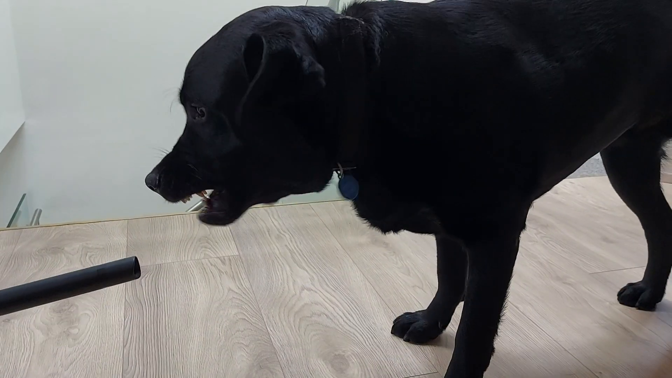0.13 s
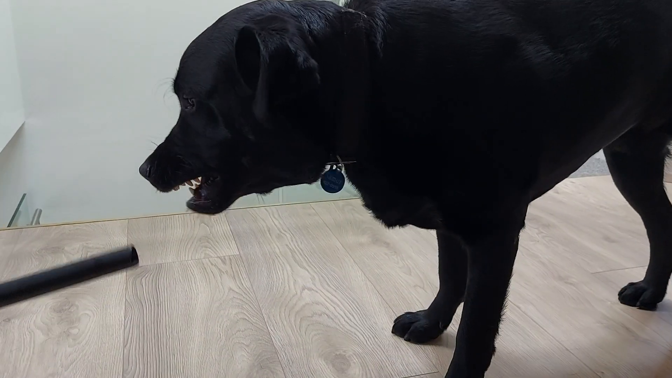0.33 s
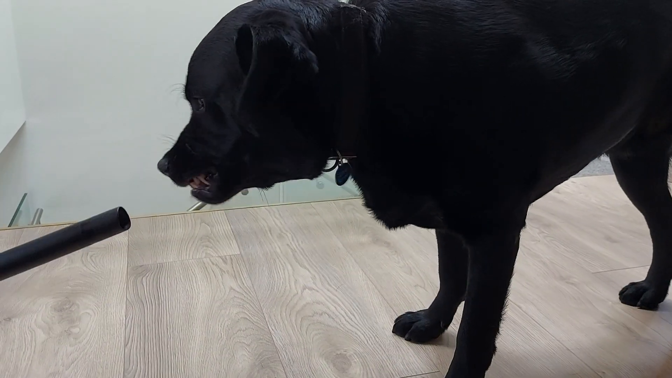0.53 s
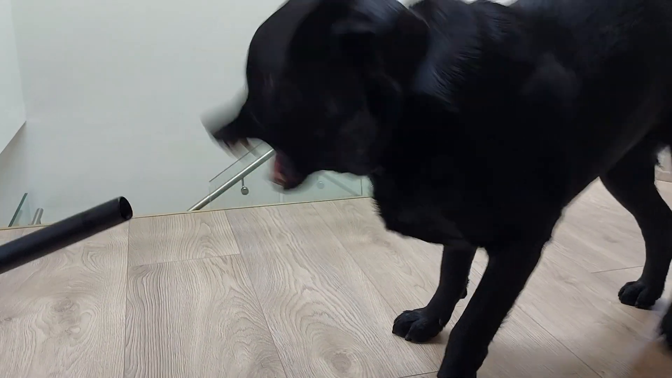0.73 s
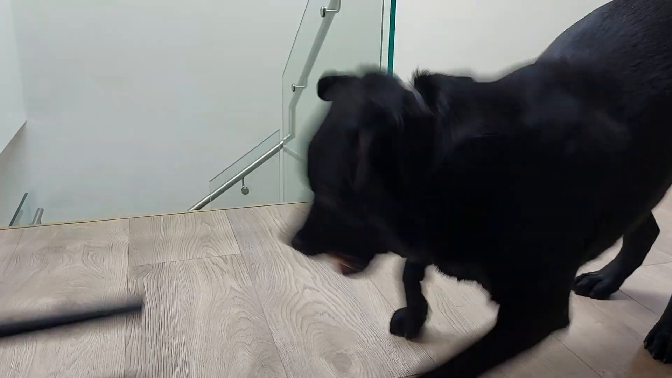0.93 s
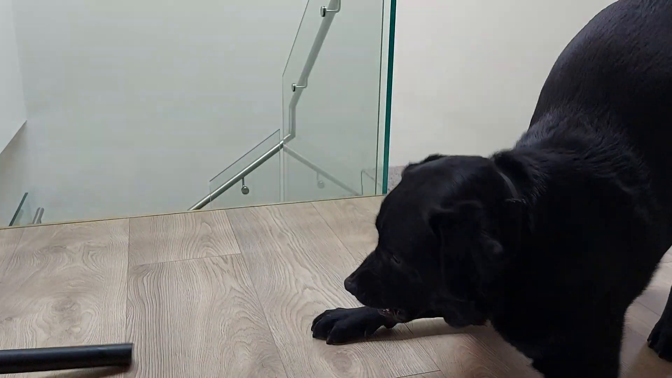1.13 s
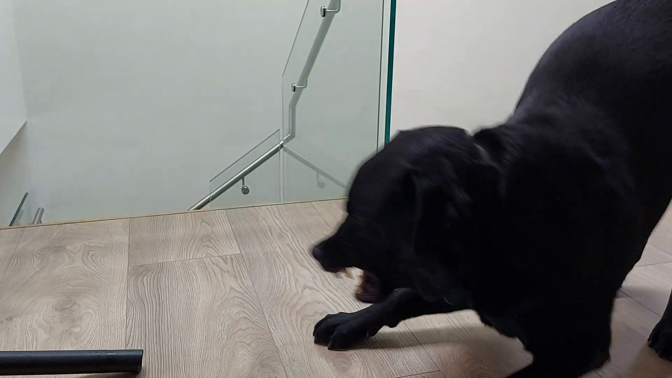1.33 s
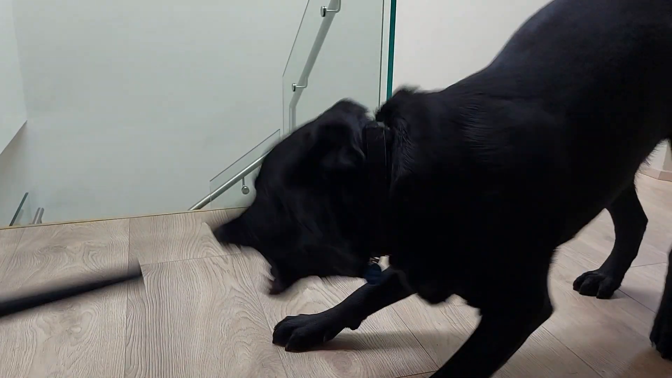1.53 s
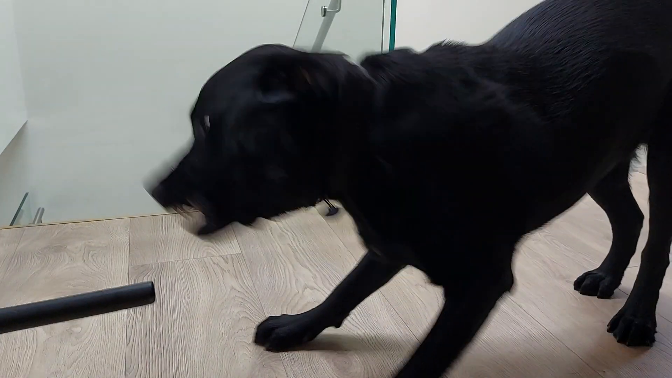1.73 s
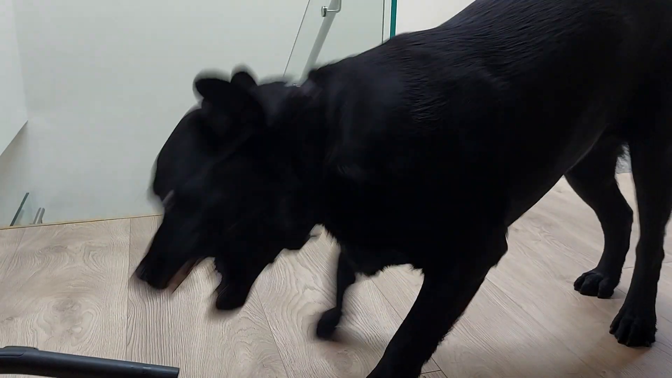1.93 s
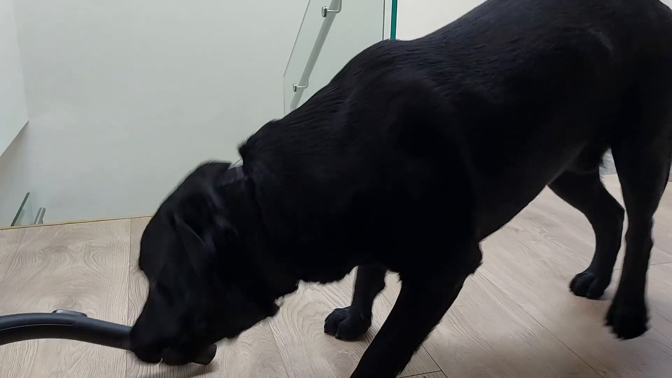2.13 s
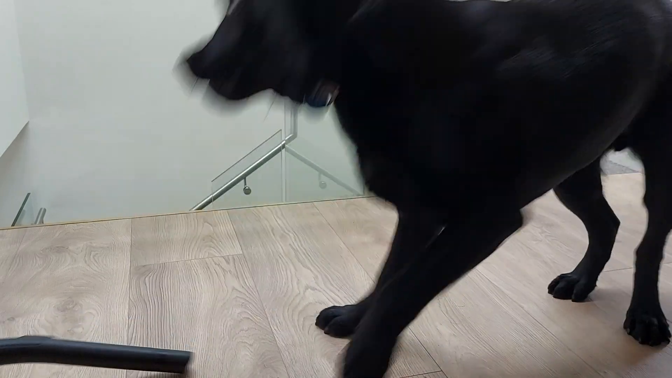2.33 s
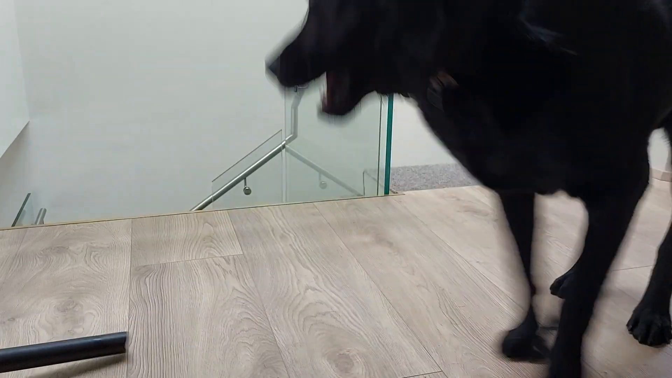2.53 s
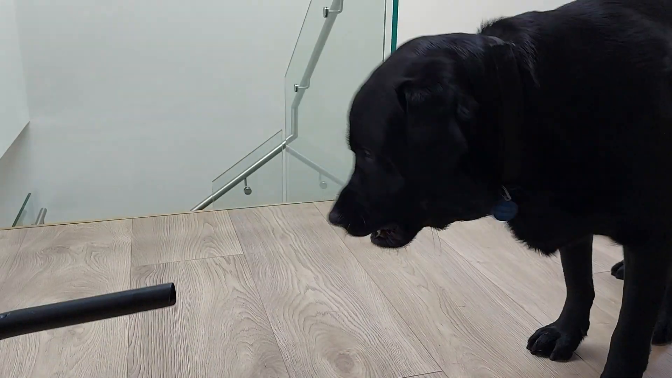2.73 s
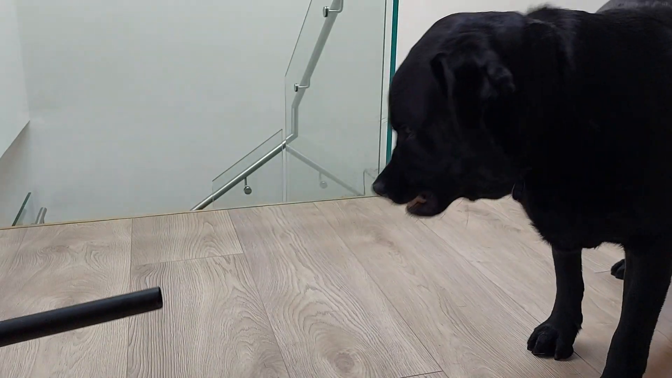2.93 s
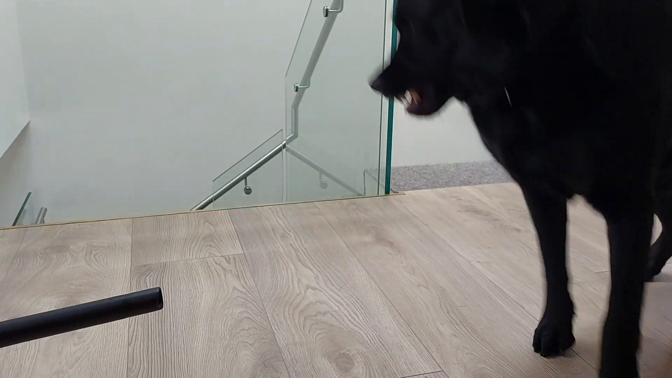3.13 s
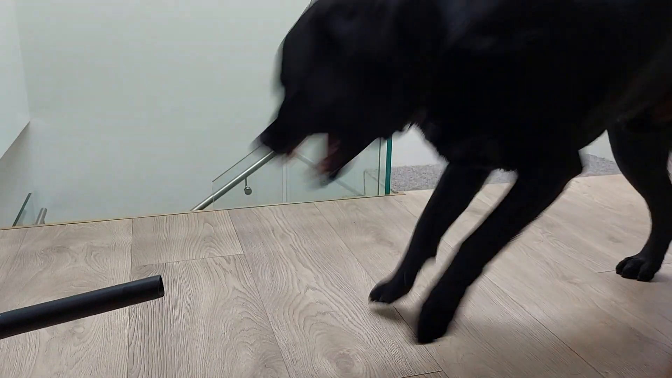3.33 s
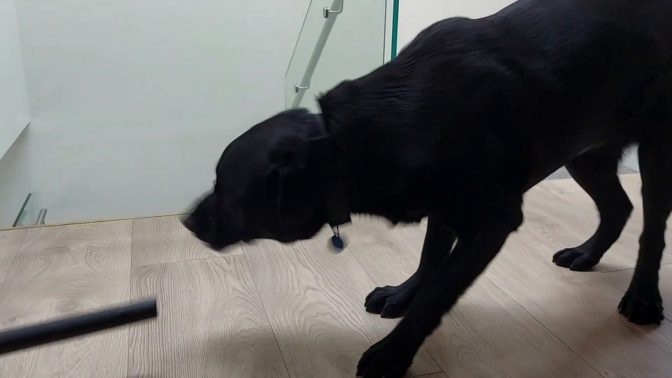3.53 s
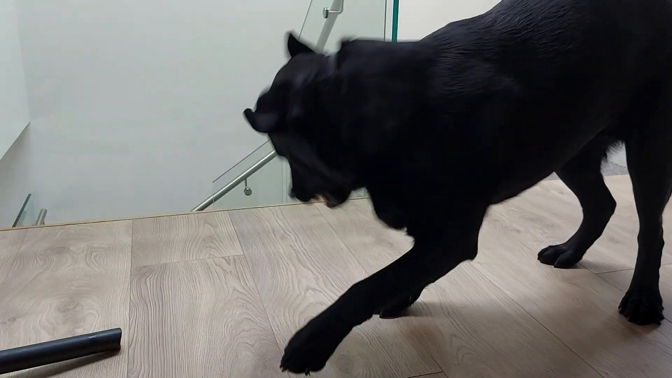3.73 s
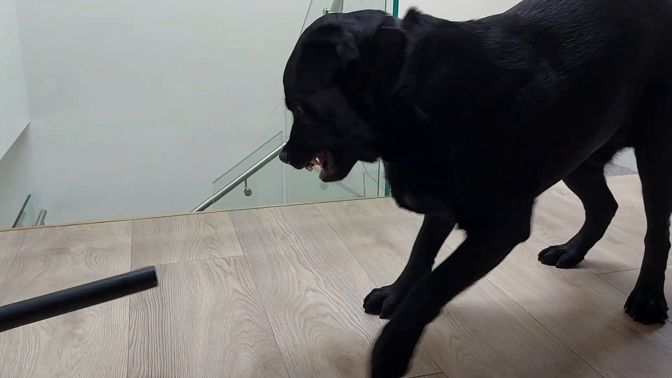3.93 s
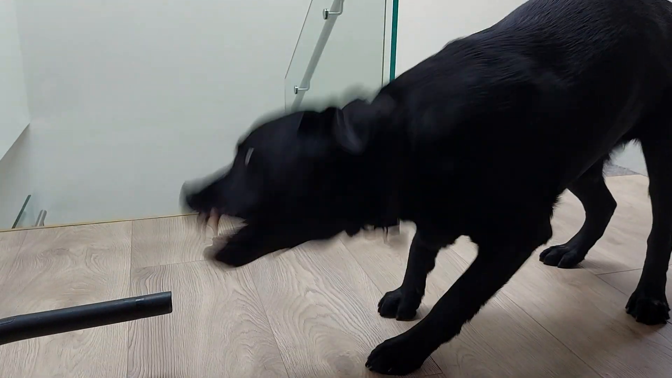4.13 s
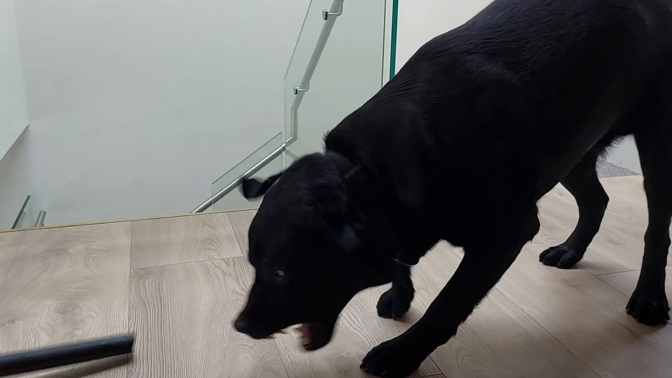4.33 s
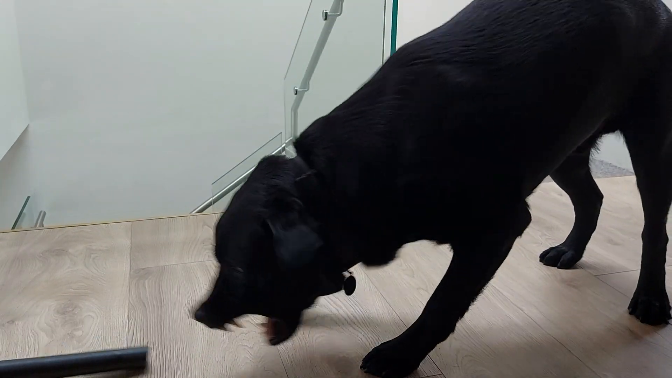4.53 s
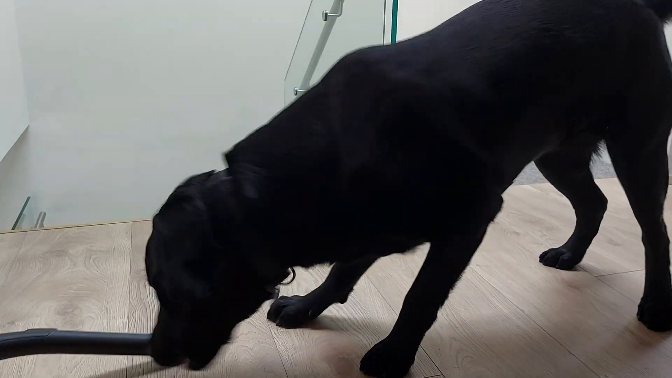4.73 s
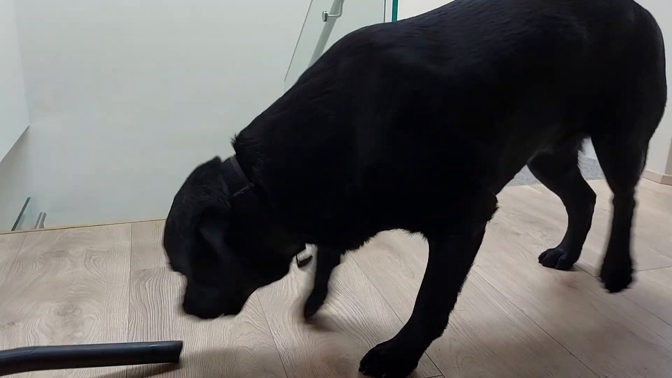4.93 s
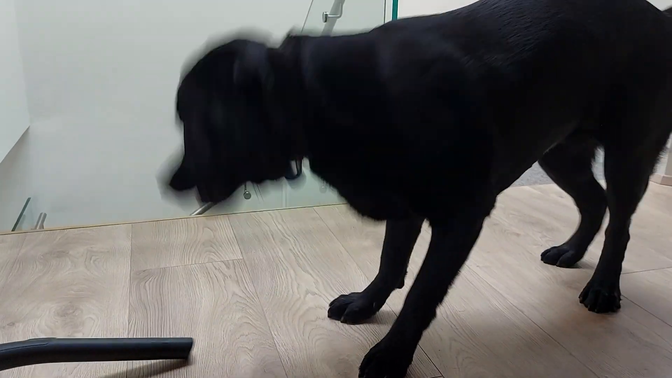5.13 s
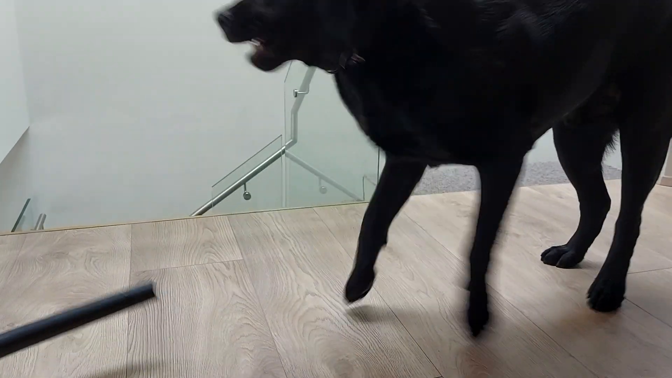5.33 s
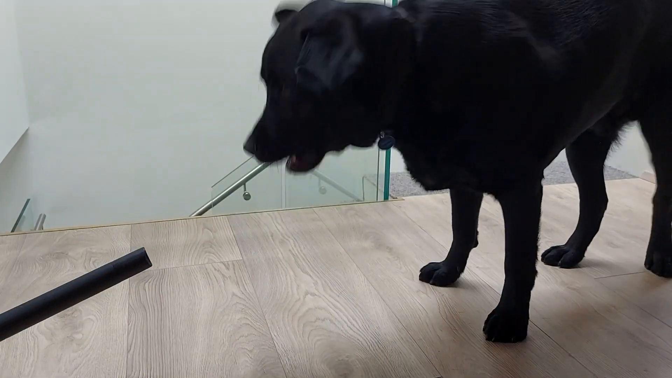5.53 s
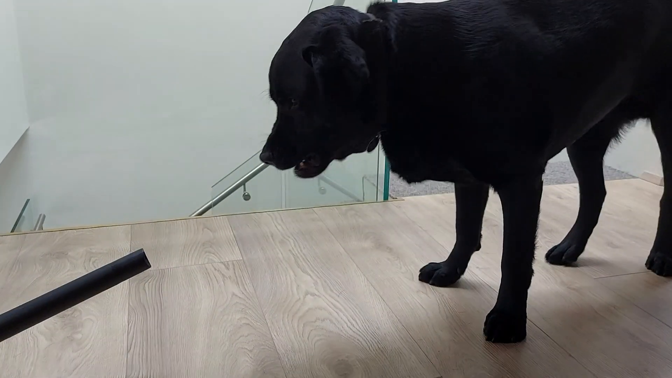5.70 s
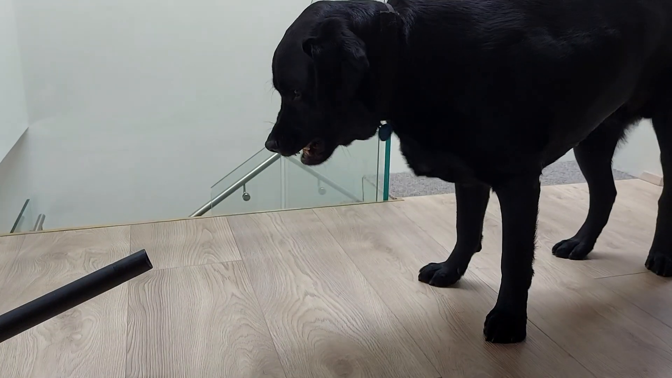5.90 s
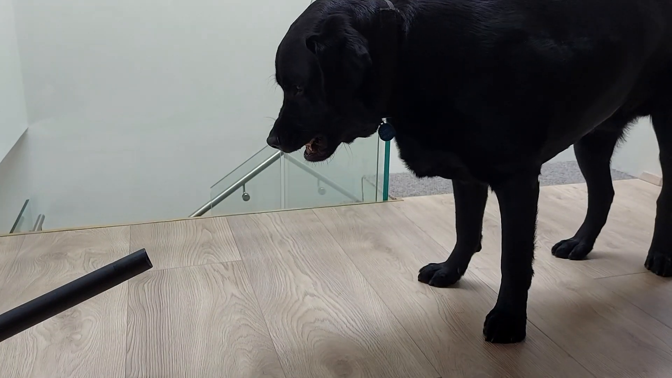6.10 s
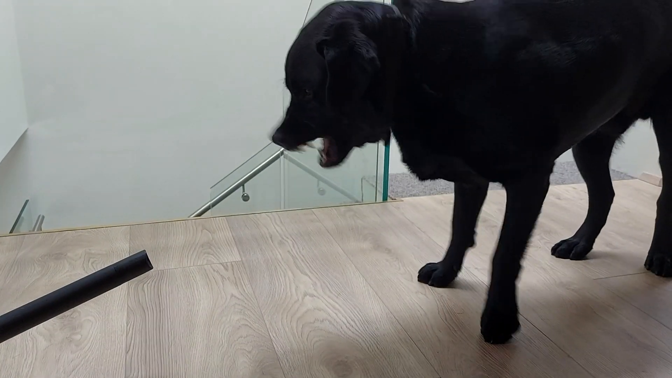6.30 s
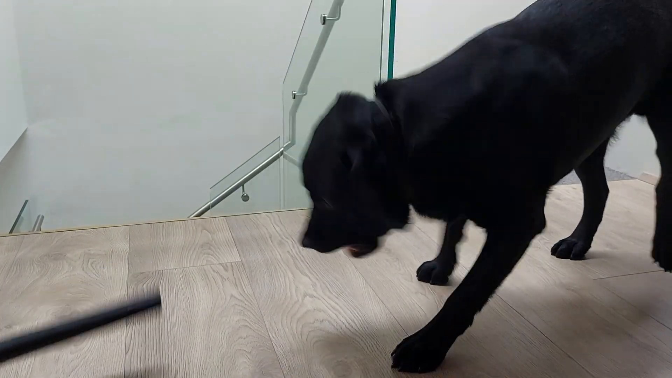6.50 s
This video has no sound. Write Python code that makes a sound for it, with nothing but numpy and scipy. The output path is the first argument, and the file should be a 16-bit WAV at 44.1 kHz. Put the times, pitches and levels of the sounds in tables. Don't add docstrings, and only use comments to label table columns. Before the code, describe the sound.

A vacuum cleaner runs throughout, a steady mid-pitched electric whine wrapped in rushing air and nozzle hiss. Close by, a large dog barks at about 0.8 s, a high, raspy bark falling in pitch, its echo ringing through a hard stairwell. Claws tick around 1.0 s, then a breathy, rising second bark comes at 1.6 s. From 2.0 to 3.0 s there are only scattered claw clicks and soft paw thuds over the motor. The background swells strongly before a short, loud bark at 3.45 s; a sharp, very brief one follows at 4.15 s, and at 4.55 s a low growl bursts into a bark. Faint collar-tag tings surround these. More claws and a thud come between 5.0 and 5.6 s. The noise swells again before a last rough, rising bark at 6.4 s, its echo lingering over the still-running vacuum.

```python
import sys
import numpy as np
from scipy import signal
from scipy.fft import rfft, irfft, next_fast_len
from scipy.io import wavfile
from scipy.ndimage import uniform_filter1d, minimum_filter1d

SR = 44100
rng = np.random.default_rng(int(sys.argv[2]) if len(sys.argv) > 2 else 0)


def voltage_ratio(level):
    return 10 ** (np.asarray(level, float) / 20)


def wav_out(sig):
    wavfile.write(sys.argv[1], SR, np.round(np.clip(np.atleast_2d(sig).T, -1, 1) * 32767).astype(np.int16))


N = 293706

# [t/s, fold pitch f/Hz, effort level/dB]
BARKS = [
    [(.762, 556.3, -47), (.812, 622.3, -24.5), (.818, 681.7, -17), (.858, 628.7, -17.5),
     (.88, 504.4, -16.5), (.955, 466, -19.5), (.985, 422, -28)],
    [(1.565, 272, -41.5), (1.6, 330.4, -23.5), (1.635, 449.2, -15.5), (1.66, 547.4, -11),
     (1.775, 514.2, -17.5), (1.83, 541, -20.5), (1.855, 533, -57)],
    [(3.45, 395.6, -57), (3.472, 453.6, -18), (3.51, 588, -19.5), (3.55, 641, -8.5), (3.595, 547, -17),
     (3.635, 466, -35.5)],
    [(4.15, 356.6, -27), (4.163, 379, -15), (4.183, 437.6, -10), (4.218, 551, -9.5), (4.238, 489.4, -11.5),
     (4.27, 398, -18.5)],
    [(4.548, 290, -70), (4.562, 279.2, -27.5), (4.65, 272.7, -26), (4.68, 307.8, -28.5),
     (4.71, 380.4, -17.5), (4.755, 534, -9), (4.805, 426.7, -18), (4.85, 443, -36)],
    [(6.38, 374, -50), (6.392, 378.1, -18.5), (6.408, 422, -18.5), (6.422, 546.3, -16.5),
     (6.5, 640.7, -24.5), (6.56, 440, -23)],
]
# [t/s, level/dB]
LIPS = [
    [(.77, -19), (.82, -11.5), (.87, -1.5), (.92, -3.5), (.96, -2)],
    [(1.6, 2.5), (1.64, -3.5), (1.71, -0.5), (1.75, -30)],
    [(3.472, 3.5), (3.492, -42), (3.51, 2), (3.55, 6), (3.59, -4.5)],
    [(4.162, 19.5), (4.19, 7), (4.218, -1.5), (4.23, -19)],
    [(4.55, 0.5), (4.71, 0.5), (4.75, -7.5), (4.77, -25)],
    [(6.38, 5), (6.42, 14), (6.45, -0.5), (6.5, -0.5)],
]
# [t/s, hoarseness 0-1, strong-weak cycles 0-1]
BREAKS = [
    (.74, .68, .1),
    (1.585, .5, .15),
    (3.515, .55, .25),
    (4.15, .5, .12),
    (4.675, .65, .2),
    (6.395, .68, .9),
]
# [mouth resonance f/Hz at middle pitch, power of pitch, breath level/dB]
JAW = [
    (1700, .01, -22.5),
    (1460, 0.25, -18.5),
    (1310, .1, -18.5),
    (1002, 0.61, -20.5),
    (1210, 0.32, -19),
    (1017, 1, -21),
]
# [breath rasp f/Hz, rasp level/dB, upper mouth level/dB, stairwell level/dB]
POSTURES = [
    (4700, 6, -5.5, -1),
    (5650, 9.5, 0, -1.5),
    (4300, -3, -2.5, 0),
    (3850, 4, -2.6, -2.5),
    (4700, 1.5, -2, -3),
    (3700, -1, -1.5, 1.5),
]
# [f/Hz, width/Hz, level/dB]
MOUTH = [(1706, 390, -2.5), (1862, 183, 1), (2136, 290, -6)]
# [f/Hz, width/Hz, level/dB]
BREATH = [(3600, 1300, 9.5), (6150, 1400, 6.5), (7230, 820, 7), (13000, 2000, -3.5)]
MIDDLE_HZ, JAW_OCTAVES_PER_DB, JAW_WIDTH_HZ = 486, 0.23, 240.
LARYNX_HZ, LARYNX_SINK_HZ, THROAT_WIDTH_HZ = 490, 70, 220.
CLEAR, BREAK_S, SHUT_DB, SHUT_SHARE = .07, .035, -30, .4
CLEAR_BREATH_DB, BREATH_PER_MOUTH = -3.5, 0.47
THROB_HZ, THROB_DB, THROB_TOP_S = 40, 4.5, .005
PORT_LAG_S, WET_DB = 0.0001, -5

# [t/s, peak level/dB, f/Hz, left minus right level/dB, bright edge level/dB]
CLAWS = [(1.0415, -17.5, 3615, -3, -41), (1.047, -33.5, 3464, 13, 8), (1.118, -25, 7500, -8, -8),
         (2.0071, -24, 4100, -2.5, -6), (2.362, -23, 3610, -3, -22), (2.5931, -19, 7550, -4, -34),
         (2.62, -27, 3540, -4, -25), (2.66, -16.5, 7100, -1, -14), (2.689, -32, 4950, 6, -21),
         (2.7289, -26, 3900, 0, -18), (2.9597, -34, 4570, -7, -6), (3.441, -36, 7900, -23, -6),
         (3.6916, -31, 7800, -12, -17), (5.0403, -30, 4077, -3, -14), (5.169, -33, 5870, -10, -19),
         (5.4314, -21, 4250, -3, -26), (5.4493, -26, 3330, -3, -21), (5.4898, -24.5, 3850, 0, -22),
         (5.591, -38, 4150, -15, -22), (6.6438, -31.5, 5260, -8, -5)]
SCRAPE_S = 0.014
# [t/s, peak level/dB]
TAG = [
    (3.4196, -42),
    (3.6676, -34),
    (4.2887, -43),
    (4.8898, -44),
]
TAG_HZ, TAG_T60_S = 10600, 0.063
# [t/s, deep boom peak level/dB, board knock peak level/dB]
THUDS = [(0.065, -44.5, -43), (0.787, -50, -29), (0.968, -60, -34), (1.119, -56, -71), (1.451, -55, -43),
         (1.693, -54, -36.5), (1.8, -57, -34), (2.205, -55, -45), (2.329, -70, -67), (3.23, -65, -52),
         (3.431, -53, -53), (3.639, -60, -33), (4.207, -51, -34), (4.754, -55, -35.5), (5.039, -48.5, -38),
         (6.434, -53, -46), (6.561, -60, -36)]
# [f/Hz, width/Hz, level/dB]
FLOOR_BOOM = [(66.6, 23, 0)]
# [f/Hz, width/Hz, level/dB]
FLOOR_KNOCK = [(91, 19, -3.5), (201, 160, -5)]

MOTOR_HZ, AIR_DB, HISS_DB = 582.8, -45.5, -54.5
# [multiple of motor pitch, rms level/dB, left port lead/rad]
WHINE = [(1, -34.5, 0.18), (2, -62, -1.6), (3, -53, -1.46), (4, -61, 1.4), (5, -64.5, 1.9), (6, -68, 2.1),
         (8, -68, 0.71), (16, -70, 0.79), (24, -74, .4)]
# [f/Hz, level/dB per Hz]
AIR = [(15, -97), (25, -66), (97, -23), (168, -34), (298, -19), (482, -24), (516, -20.5), (579, -23),
       (620, -19.5), (664, -22.5), (1320, -29.5), (1620, -25.5), (1780, -32.5), (1910, -27.5),
       (6000, -32.5), (7800, -90), (13200, -120)]
# [f/Hz, level/dB per Hz]
HISS = [(3500, -15), (5000, -52), (6200, -3), (7400, 0.5), (8600, -6.5), (10400, -6), (11600, 0.5),
        (13400, -8), (14600, -18), (15900, -9)]
# [t/s, hiss level/dB]
HISS_LEVELS = [(0, 4), (.8, 6.5), (1.55, 3.5), (1.8, 5.5), (2.3, 6), (2.6, 6.5), (3.2, 4), (3.44, 4), (3.6, 7),
               (3.75, 3), (4.1, 5.5), (4.3, 4), (4.55, 3.5), (5.1, 4), (6.382, 4), (6.5, 2), (6.66, -1.5)]

# [spectrum bin number, 1.35 Hz each; t60/s]
STAIRWELL = [(250, 0.81), (700, 0.74), (2000, 0.95), (6000, 0.42)]
# [f/Hz, left-right likeness -1 to 1]
LIKENESS = [(60, 0.93), (300, 0.96), (640, 0.78), (1400, 0), (3000, 0.067), (16000, .0)]
# [f/Hz, left minus right level/dB]
LEAN = [(60, 4), (110, -1), (200, -2), (380, -1), (700, -3.5), (1290, -0.5), (2380, -4.5), (4400, -0.5),
        (8120, -10.5), (15000, 5)]
# [top t/s, swell level/dB, lead/s, duck level/dB]
SWELLS = [
    (.8, 7, 0.13, 2),
    (1.55, 4, 0.66, -0.5),
    (2.3, 1.5, 0.25, -0.2),
    (3.438, 10.5, 0.51, 1),
    (4.1, 0.5, 0.17, -2),
    (4.55, -0.1, 0.27, -1),
    (6.38, 8.5, .42, 3),
]
REST_DB, SWELL_POWER, DUCK_S, RECOVER_S = 0.41, 1.34, 0.15, 0.31
LOW_CUT_HZ, HIGH_CUT_HZ, CEILING = 32, 15750, .99


def dog():
    out = np.zeros((2, N + 2 * SR))
    for rows, (*posture, wet_db), *habits in zip(BARKS, POSTURES, LIPS, BREAKS, JAW):
        voice, breath = bark(rows, habits, *posture)
        at = round(rows[0][0] * SR)
        i = np.arange(len(voice))
        late = np.interp(i - PORT_LAG_S * SR, i, voice)
        near = np.array([voice * voltage_ratio(1.8), late]) + breath * voltage_ratio([[-2], [1.5]])
        heard = voltage_ratio(WET_DB + wet_db) * stairwell(near)
        heard[:, :len(voice)] += near
        out[:, at:at + heard.shape[1]] += heard
    return out[:, :N]


def bark(rows, habits, rasp_hz, rasp_db, upper_db):
    s, *columns = np.transpose(rows)
    t = np.arange(s[0], s[-1], 1 / SR)
    hz, effort_db = [np.interp(t, s, c) for c in columns]
    mouth_db, hoarse, paired, breath_db, jaw_hz, throat_hz = manner(t, hz, *habits)
    throb = np.cos(2 * np.pi * THROB_HZ * (t - THROB_TOP_S))
    shut = np.clip(mouth_db / SHUT_DB, 0, 1)
    effort_db = effort_db + THROB_DB * (hoarse > CLEAR) * shut * throb

    phase = 2 * np.pi * np.cumsum(hz * (1 + 0.0708 * hoarse * drift(84.3, len(t)))) / SR
    pulses = sum(np.cos(k * phase) * np.clip((3000 - k * hz) / 300, 0, 1) for k in range(1, 11))
    pulses = pulses * (1 + 1.12 * paired * np.cos(phase / 2)) * voltage_ratio(3.2 * hoarse * drift(57, len(t)))
    gust = rng.standard_normal((3, len(t))) * (1 + .6 * np.cos(phase))
    hum = np.sqrt(1 - hoarse) * pulses + 3.5 * hoarse * gust[0]
    source = (1 - hoarse) * pulses + 8 * hoarse * gust[0]

    throat = glide(hum, throat_hz, THROAT_WIDTH_HZ)
    throat = throat + 0.5 * paired * np.clip((hz - 570) / 60, 0, 1) * np.cos(phase / 2)
    mouth = voltage_ratio(upper_db) * resonate(source, MOUTH) - glide(source, jaw_hz, JAW_WIDTH_HZ)
    voice_band = signal.butter(6, [285, 2570], "band", fs=SR, output="sos")
    voice = signal.sosfilt(voice_band, throat + voltage_ratio(mouth_db) * mouth)
    voice = voice / np.sqrt(uniform_filter1d(voice ** 2, size=900) + 1e-9)

    whistle_hz = rasp_hz * (1 + 0.057 * drift(5.4, len(t)))
    rasp = np.array([glide(glide(g, whistle_hz, 570), whistle_hz, 580) for g in gust[1:]])
    patches = voltage_ratio(rasp_db + 5.5 + 4.5 * drift(22, len(t)))
    breath = resonate(gust[1:], BREATH) + patches * rasp
    breath_gain = voltage_ratio(effort_db + breath_db + 1.9 * drift(53, len(t)))
    return voltage_ratio(effort_db) * voice, breath_gain * rms_one(breath)


def manner(t, hz, lips, breaking, jaw):
    break_s, hoarse, paired = breaking
    jaw_hz, power, breath_db = jaw
    mouth_db = np.interp(t, *np.transpose(lips))
    broken = np.clip((t - break_s) / BREAK_S, 0, 1)
    closing_db = np.clip(mouth_db, SHUT_DB, 0)
    strain = broken * (1 - (1 - SHUT_SHARE) * closing_db / SHUT_DB)
    hoarse = CLEAR + (hoarse - CLEAR) * strain
    breath_db = breath_db + CLEAR_BREATH_DB * (1 - broken) + BREATH_PER_MOUTH * closing_db
    jaw_hz = jaw_hz * (hz / MIDDLE_HZ) ** power * 2 ** (JAW_OCTAVES_PER_DB * closing_db)
    throat_hz = np.maximum(hz, LARYNX_HZ - LARYNX_SINK_HZ * broken)
    return mouth_db, hoarse, paired * broken, breath_db, jaw_hz, throat_hz


def glide(x, hz, width_hz):
    r = np.exp(-np.pi * width_hz / SR)
    zeros = np.array([1, 0, -1]) * (1 - r * r) / 2
    out, state = np.zeros(len(x)), np.zeros(2)
    for i in range(0, len(x), 64):
        poles = [1, -2 * r * np.cos(2 * np.pi * hz[i] / SR), r * r]
        out[i:i + 64], state = signal.lfilter(zeros, poles, x[i:i + 64], zi=state)
    return out


def resonate(x, modes):
    out = 0
    for k, (hz, width, db) in enumerate(modes):
        r = np.exp(-np.pi * width / SR)
        poles = [2, -4 * r * np.cos(2 * np.pi * hz / SR), 2 * r * r]
        out = out + (-1) ** k * voltage_ratio(db) * signal.lfilter([1 - r * r, 0, r * r - 1], poles, x)
    return out


def claws():
    out, t = np.zeros((2, N + 4410)), np.arange(4410) / SR
    wide = signal.butter(4, [1600, 8500], "band", fs=SR, output="sos")
    top = signal.butter(2, [9000, 15000], "band", fs=SR, output="sos")
    shape = (np.exp(-t / 0.0013) + 0.31 * np.exp(-t / SCRAPE_S)) * (1 - np.exp(-t / 0.00098))
    for s, db, hz, pan_db, edge_db in CLAWS:
        grit = rng.standard_normal((2, len(t))) * shape
        ring = resonate(resonate(grit, [(hz, 1600, 3)]), [(hz, 1600, 0)])
        edge = voltage_ratio(edge_db - 1.0) * signal.sosfilt(top, grit)
        tick = 0.67 * signal.sosfilt(wide, grit) + ring + edge
        at = round(s * SR)
        out[:, at:at + len(t)] += voltage_ratio(db + 4.5 + pan_db * np.array([[.5], [-.5]])) * tick
    return out[:, :N]


def tag():
    out, t = np.zeros(N), np.arange(SR // 8) / SR
    for s, db in TAG:
        decay = voltage_ratio(db - 60 * t / TAG_T60_S)
        ring = decay * np.sin(2 * np.pi * TAG_HZ * t) * (1 - np.exp(-t / .002))
        at = round(s * SR)
        out[at:at + len(t)] += ring
    return out


def paws():
    out, t = np.zeros((2, N + SR)), np.arange(SR // 3) / SR
    shape = (1 - np.exp(-t / 0.0024)) * np.exp(-t / 0.08)
    for s, boom_db, knock_db in THUDS:
        mid, side = rng.standard_normal((2, len(t))) * shape
        push = mid + 0.17 * side * [[1], [-1]]
        shakes = [resonate(resonate(push, modes), modes) for modes in (FLOOR_BOOM, FLOOR_KNOCK)]
        boom, knock = [v / np.abs(v).max() for v in shakes]
        at = round(s * SR)
        out[:, at:at + len(t)] += voltage_ratio(boom_db + 5.5) * boom + voltage_ratio(knock_db - 3) * knock
    return out[:, :N]


def vacuum(hiss_db):
    turn = 2 * np.pi * np.cumsum(MOTOR_HZ + 0.369 * drift(3.5, N)) / SR
    ports = np.array([[.5], [-.5]])
    whine = sum(voltage_ratio(db) * np.sin(int(k) * turn + lead * ports) for k, db, lead in WHINE)
    size = next_fast_len(N)
    air = voltage_ratio(AIR_DB + 0.22 * drift(19, N)) * diffuse(AIR, size)[:, :N]
    hiss = voltage_ratio(HISS_DB + hiss_db + 0.41 * drift(28, N)) * diffuse(HISS, size)[:, :N]
    return np.sqrt(2) * voltage_ratio(1.1 * drift(4.2, N)) * whine + air + hiss


def stairwell(x):
    size = 32768
    t, hz = np.arange(size) / SR, np.arange(size // 2 + 1) * 1
    colour = [(20, -28), (330, 4.5), (550, 1.0), (1200, 3), (2500, -6), (3500, -2.5), (16000, -2)]
    echoes = rfft(diffuse(colour, size, apart=0.18))
    centres = np.log(np.array(STAIRWELL)[:, 0])
    response = 0
    for k, (_, t60) in enumerate(STAIRWELL):
        share = np.interp(np.log(hz + 1), centres, np.arange(len(centres)) == k)
        response = response + irfft(echoes * share, size) * voltage_ratio(-60 * t / t60)
    response = response * np.clip((t - .006) / 0.015, 0, 1)
    return signal.fftconvolve(x, response / np.sqrt(np.sum(response ** 2) / 2), axes=1)


def diffuse(spectrum, size, apart=0):
    hz = np.arange(size // 2 + 1) * SR / size
    mid, side = rfft(rng.standard_normal((2, size)))
    alike = np.clip(at_hz(LIKENESS, hz) - apart, -1, 1)
    lean = voltage_ratio(at_hz(LEAN, hz) * [[.5], [-.5]])
    both = np.sqrt(1 + alike) * mid + np.sqrt(1 - alike) * side * [[1], [-1]]
    return rms_one(irfft(both * lean * voltage_ratio(at_hz(spectrum, hz)), size))


def at_hz(points, hz):
    point_hz, values = np.array(points).T
    return np.interp(np.log(hz + 1), np.log(point_hz), values)


def drift(rate, size):
    r = np.exp(-2 * np.pi * rate / SR)
    wander = signal.lfilter([1], [1, -2 * r, r * r], rng.standard_normal(size + 4000))
    return rms_one(wander[4000:])


def rms_one(x):
    return x / np.sqrt(np.mean(x ** 2) + 1e-20)


def gain_ride():
    t, ride_db = np.arange(N) / SR, REST_DB
    for s, swell_db, lead, duck_db in SWELLS:
        climb = swell_db * np.clip(1 - (s - t) / lead, 0, 1) ** SWELL_POWER
        fall = np.interp(t - s, [0, DUCK_S, DUCK_S + RECOVER_S], [swell_db, duck_db, 0])
        ride_db = ride_db + np.where(t < s, climb, fall)
    return ride_db


def scene():
    small = claws() + tag()
    small = voltage_ratio(-2) * small + voltage_ratio(-4.5) * stairwell(small)[:, :N]
    hiss_db = np.interp(np.arange(N) / SR, *np.transpose(HISS_LEVELS))
    return dog() + small + paws() + vacuum(hiss_db)


def low_pass(x):
    return signal.sosfilt(signal.butter(12, 16670, fs=SR, output="sos"), x)


def record(dry):
    loud = dry * voltage_ratio(gain_ride())
    low_cut = signal.butter(2, LOW_CUT_HZ, "high", fs=SR, output="sos")
    high_cut = signal.ellip(10, .3, 45, HIGH_CUT_HZ, fs=SR, output="sos")
    loud = signal.sosfilt(high_cut, signal.sosfilt(low_cut, loud))
    room_left = np.minimum(1, CEILING / (np.abs(loud).max(axis=0) + 1e-9))
    held = loud * uniform_filter1d(minimum_filter1d(room_left, size=257), size=129)
    return low_pass(held)


dry = scene()
out = record(dry)
wav_out(out)
```